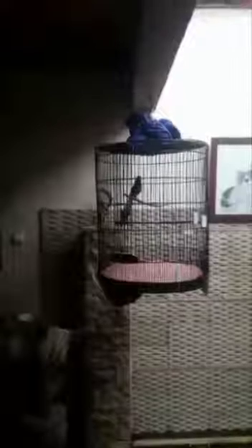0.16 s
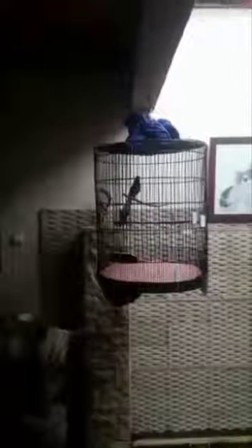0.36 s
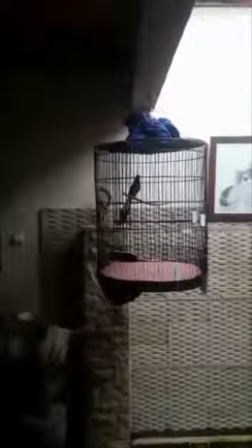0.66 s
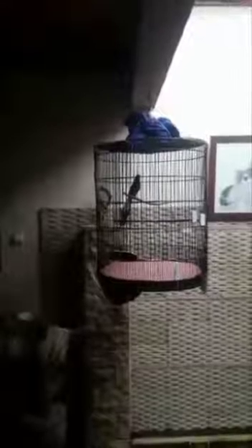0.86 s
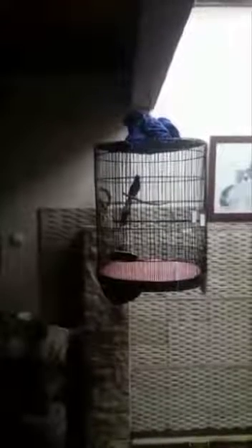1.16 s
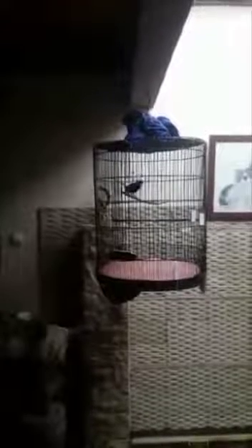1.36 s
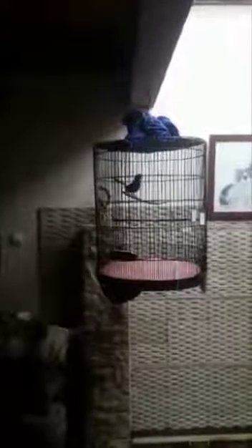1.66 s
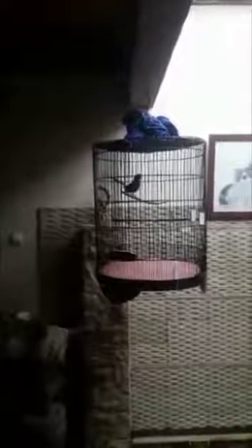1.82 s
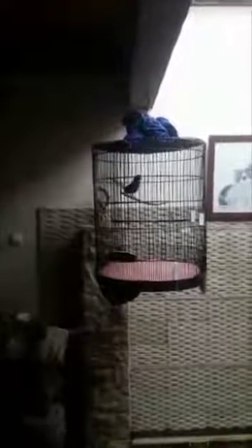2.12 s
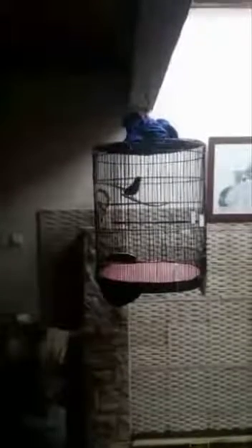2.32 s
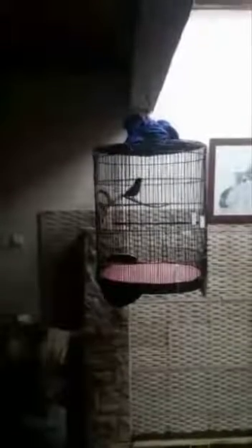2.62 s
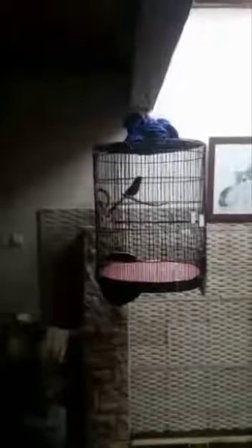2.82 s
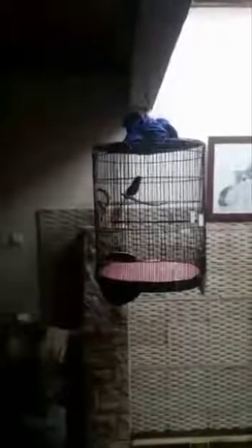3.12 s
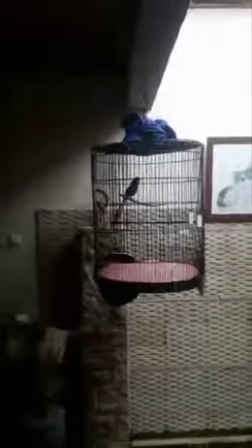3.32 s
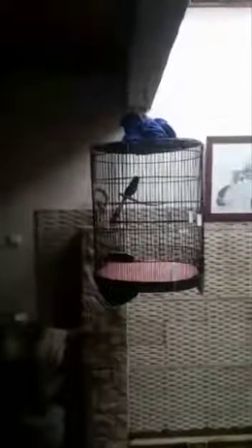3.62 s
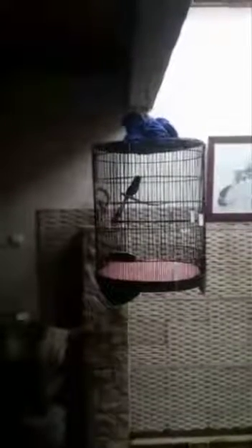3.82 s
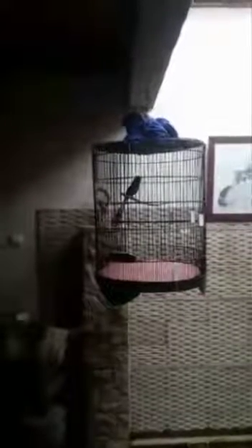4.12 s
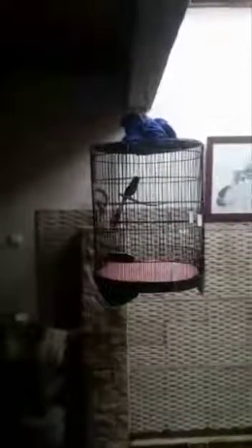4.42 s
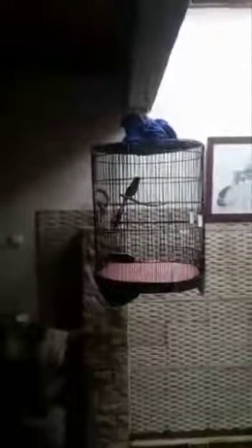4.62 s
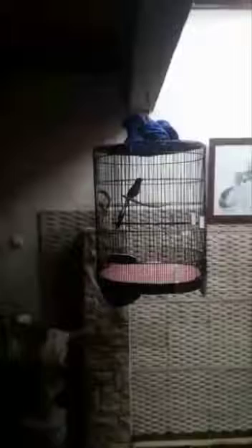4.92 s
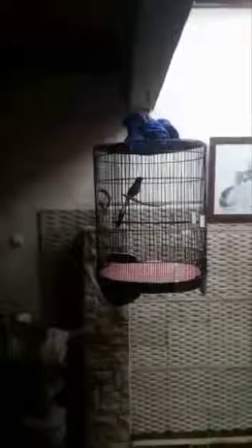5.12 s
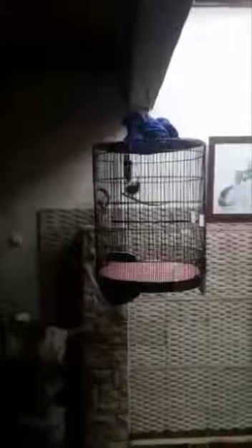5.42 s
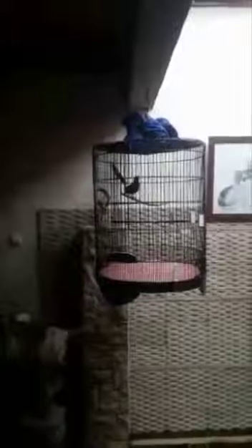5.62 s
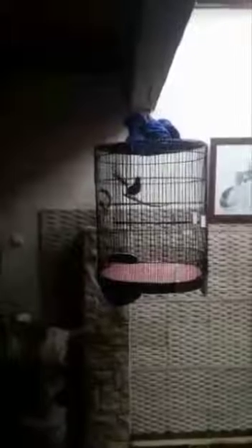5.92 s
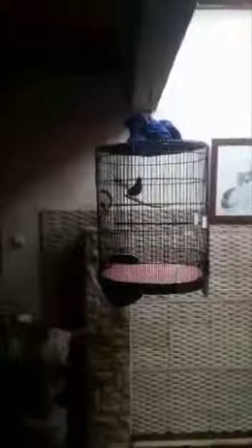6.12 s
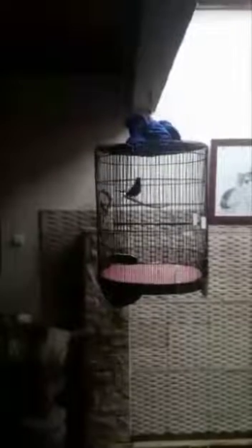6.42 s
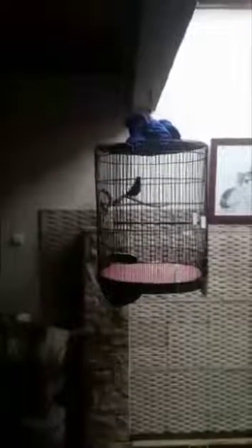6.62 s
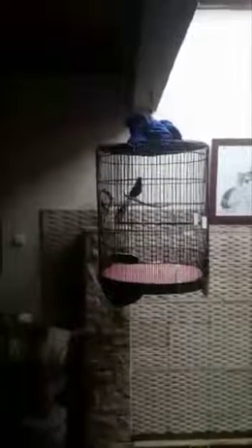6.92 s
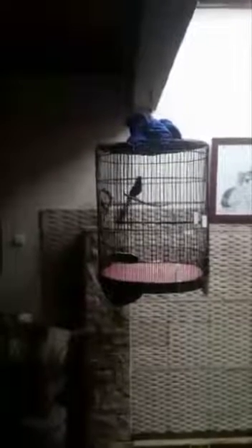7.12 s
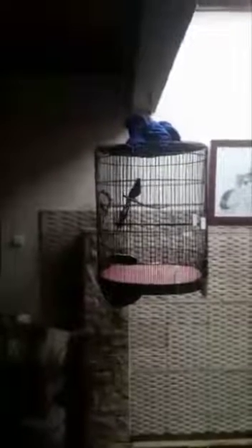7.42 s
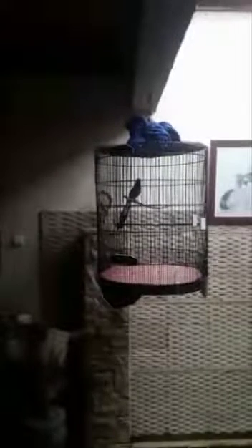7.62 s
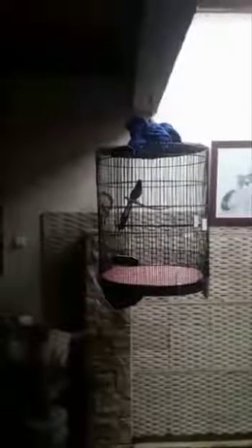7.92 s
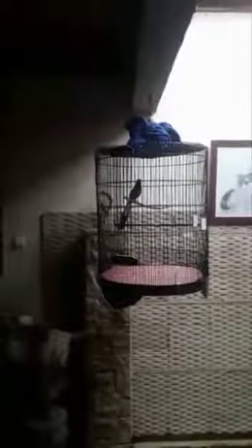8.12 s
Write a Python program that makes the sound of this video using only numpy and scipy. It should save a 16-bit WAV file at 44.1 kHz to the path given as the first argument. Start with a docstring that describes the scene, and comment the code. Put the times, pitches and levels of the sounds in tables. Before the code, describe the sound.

A songbird in a hanging cage sings loudly a few metres from the microphone in a bare, echoing room. Each phrase opens with a sharp call and several swooping notes, pauses, then breaks into a rapid rattle of high chips and a falling run of whistles. It sings this twice and begins a third. Brief wing flicks and soft cage knocks come in between, over a faint murmuring hum and distant engine.

```python
"""In a bare, echoing room, a shama (a songbird) sings in a hanging cage, a few metres from a phone.
Its phrase: a sharp two-voiced call, swoops that dive and climb, a rattle of steep high chips, then a
falling run of whistles. Its voice box, the syrinx, has two sides that can each make a gliding tone.
Wings flick and the cage is knocked now and then, over a low murmur, an engine and a far-off bird."""
import sys
import numpy as np
from scipy import signal
from scipy.fft import rfft, irfft, next_fast_len
from scipy.io import wavfile
from scipy.ndimage import uniform_filter1d, minimum_filter1d, map_coordinates

SR = 44100
rng = np.random.default_rng(int(sys.argv[2]) if len(sys.argv) > 2 else 0)


def int16_out(signal):
    """Quantize to a 16-bit WAV file."""
    q = np.round(np.clip(np.atleast_2d(signal).T, -1, 1) * 32767)
    wavfile.write(sys.argv[1], SR, q.astype(np.int16))


N = 364266
TOP_HZ = 14000  # the highest frequency the phone keeps

# How the throat boosts or softens each frequency (frequency [Hz], gain [dB])
THROAT = [(700, -13), (1150, -4.5), (1700, 1.5), (2700, 0), (3600, 0), (4500, -7.5), (5300, -1), (6200, 0),
          (7000, 0), (9000, 2), (10400, -1.5), (11300, 10), (12100, 22.5), (13000, -13)]
# The breathy hiss in the voice (frequency [Hz], level [dB])
RASP = [(400, -12.5), (1000, -10), (2500, 3.5), (3500, -1.5), (4300, -3), (5500, -8), (7000, -9),
        (9000, -6), (10500, -13.5), (12100, -34), (13200, -15)]
def syrinx(pitch, overtone_db, falloff_db, waver, rasp_db):
    """The voice box makes a slightly unsteady tone with weak overtones and hiss, shaped by the throat."""
    n = len(pitch)
    phase = 2 * np.pi * np.cumsum(pitch * (1 + waver * wobble(n, 401.3))) / SR
    tone = amp(along(THROAT, pitch)) * np.sin(phase)
    for k in range(2, 6):  # overtones are whole multiples of the pitch
        gain = amp(overtone_db + falloff_db * (k - 2.5) + along(THROAT, k * pitch))
        tone += gain * (k * pitch < TOP_HZ) * np.sin(k * phase)
    return np.sqrt(2) * tone + amp(rasp_db) * coloured(noise(n, RASP), THROAT)


def sing(out, s, syllable, hz, db, easy_hz=2100, strained_hz=2650):
    """Sing a syllable, a small group of notes: each glides in pitch and flutters a little in level."""
    for delay, length, *ratios, waver, attack, release, note_db, overtone_db in syllable:
        u = np.linspace(0, 1, int(length * SR))
        glide = hz * contour(ratios, u)
        rasp_db = np.interp(glide.mean(), [easy_hz, strained_hz], [-30.5, -31])
        note = syrinx(glide, overtone_db, falloff_db=-11, waver=waver, rasp_db=rasp_db)
        slack_db = 0.5 * np.log2(np.minimum(glide / hz, 1))  # weaker below the main pitch
        level_db = db + note_db + slack_db + 1.02 * wobble(len(u), 300)
        add(out, s + delay, in_room(amp(level_db) * note * swell(u, attack, release), direct_db=-6))


def voice(t, hz, start, shape):
    """One side of the syrinx: it comes in low at t = 0, slides up to its pitch and wavers there."""
    length, settle, waver, attack, release = shape
    pitch = hz * (1 - (1 - start) * np.exp(-(t / settle) ** 2))
    pitch *= 1 + waver * wobble(len(t), 502.5)
    return np.sin(2 * np.pi * np.cumsum(pitch) / SR) * swell(t / length, attack, release)


# A soft rising syllable, one row per note (delay [s], length [s], several pitches from start to end
# [ratio], waver [share of pitch], fade-in and fade-out [share of length], level [dB], overtones [dB])
SCOOP = [(-0.049, 0.048, 0.88, .98, 1.35, 2.4, .06, .08, .5, -15, -30)]
# The call's two voices (length [s], slide time [s], waver [share], fade-in [share], fade-out [share])
YELP = (.07, .009, .016, .08, .45)
HELD = (0.076, .03, 0.014, 0.68, .3)
# The harsh extra tones the two voices make together (frequency [Hz], gain [dB])
CLASH = [(800, -41), (2000, -5.5), (3600, 16.5), (4400, 4.5), (5300, 6.5), (7000, 5.5), (9000, -12.5),
         (13000, -20)]
# Opening calls (time [s], held voice's time [s], yelp pitch [Hz], held pitch [Hz],
# held voice's starting pitch [ratio], yelp level [dB], held level [dB])
CALLS = [(0.135, 0.151, 2824, 2650, 0.85, -18.5, -16), (3.746, 3.771, 3015, 2548, .87, -18, -13),
         (7.615, 7.629, 3012, 2543, .86, -18.5, -13.5)]
def calls(out, scoop_hz=917):
    """A soft scoop, then a sharp yelp; the other side of the syrinx joins in lower and the two clash."""
    t = np.arange(SR // 8) / SR
    for s, held_s, yelp_hz, held_hz, held_start, yelp_db, held_db in CALLS:
        sing(out, s, SCOOP, scoop_hz, held_db)
        yelp = amp(yelp_db - held_db) * voice(t, yelp_hz, start=0.74, shape=YELP)
        both = yelp + voice(t + s - held_s, held_hz, held_start, HELD)
        clash = coloured(amp(-27) * both ** 2 + amp(-18) * both ** 3, CLASH)
        loudness = np.abs(signal.hilbert(both))
        rasp = amp(-26) * coloured(noise(len(t), RASP), THROAT) * loudness
        flutter = amp(2 * wobble(len(t), rate=700))
        add(out, s, in_room(amp(held_db) * (both + clash + rasp) * flutter, direct_db=-4))


# The three syllables of a swoop, with the same columns as SCOOP
DIVE = [(-.016, .022, .6, .68, .78, .92, .04, .4, .3, -15, -46),
        (0, .02, .86, 1.0, 1.02, .95, .04, .15, .4, -1, -46),
        (.012, .03, .92, .8, .6, .42, .05, .25, .3, -4, -46),
        (.018, .03, .92, 1.02, 1.02, .88, .04, .2, .6, -2, -46)]
TURN = [(-.052, .054, .3, .42, .52, .53, .66, .06, .45, .3, -5, -48)]
CLIMB = [(-.003, .076, 0.55, .83, .91, .965, .975, .91, 0.02, 0.12, 0.62, 0, -35)]
# Swoops (time [s], climb time [s], dive pitch [Hz], climb pitch [Hz], dive level [dB], climb level [dB])
SWOOPS = [(0.277, 0.398, 1665, 2644, -18.5, -19.5), (0.526, 0.632, 1729, 2747, -20, -16.5),
          (0.779, 0.868, 1688, 2730, -22, -17.5), (3.895, 4.032, 1705, 2616, -19.5, -20),
          (4.148, 4.224, 1824, 2782, -19, -19.5), (4.353, 4.427, 1881, 2609, -23.5, -17.5),
          (4.553, 4.634, 1866, 2700, -21.5, -20), (7.757, 7.881, 1700, 2584, -20.5, -17),
          (8.029, 8.118, 1693, 2660, -21.5, -18.5)]
def swoops(out):
    """The voice barks twice as it tumbles an octave, turns, then climbs fast and fades at the top."""
    for s, climb_s, dive_hz, climb_hz, dive_db, climb_db in SWOOPS:
        sing(out, s, DIVE, dive_hz, dive_db)
        sing(out, climb_s, TURN, climb_hz, dive_db)
        sing(out, climb_s, CLIMB, climb_hz, climb_db)


# A chip's fall and its spring back up (pitches from start to end [ratio])
PLUNGE = [0.88, 0.97, .78, .70, 0.645, 0.53]
REBOUND = [1, 0.86, 0.91]
# Chips (time [s], top pitch [Hz], depth of fall [exponent], level [dB], extra weight on the low end [dB])
CHIPS = [(1.779, 6440, 1.3, -32, -46.5), (1.882, 6310, 0.97, -22.5, 5), (1.981, 6390, 0.96, -20, 10),
         (2.073, 6170, 0.96, -19.5, 1.5), (2.160, 6320, 1, -20.5, 10.5), (2.249, 6330, 1.1, -21.5, -10.5),
         (2.337, 6230, 1.05, -21, -7), (2.426, 6260, 0.92, -19, 6), (2.517, 6100, 0.99, -21, 2),
         (2.610, 6080, 0.94, -20.5, -0.5), (2.727, 6000, 0.95, -24, 1), (5.506, 6336, 1.15, -25, -22),
         (5.615, 6420, 0.98, -25.5, -13), (5.707, 6760, 1.27, -21.5, -18.5), (5.795, 6610, 0.95, -21.5, 20),
         (5.885, 6305, 0.92, -20, 10), (5.974, 6260, 0.88, -18, 11), (6.061, 6315, 1.12, -21.5, -0.5),
         (6.159, 6290, 0.92, -21.5, 3.5), (6.256, 6110, 1.1, -21, -6.5), (6.347, 6050, 1, -22, -14),
         (6.440, 6056, 1.06, -20.5, -14), (6.553, 5960, 0.87, -22, -4)]
def rattle(out, chip_s=.052, rebound_s=.024, rebound_delay_s=.04):
    """Each chip hangs at its top for an instant, plunges almost an octave and springs back softly."""
    u = np.linspace(0, 1, int(chip_s * SR))
    v = np.linspace(0, 1, int(rebound_s * SR))
    for s, top_hz, depth, db, lean_db in CHIPS:
        plunge_hz = top_hz * contour(PLUNGE, u) ** depth
        chip = syrinx(plunge_hz, overtone_db=-34.5, falloff_db=7.5, waver=.016, rasp_db=-34.5)
        chip *= swell(u, rise=0.42, fall=0.59)
        level_db = db + lean_db * (u - .5) + 3 * wobble(len(u), rate=700)
        add(out, s, in_room(amp(level_db) * chip, direct_db=-8))
        rebound_hz = top_hz * contour(REBOUND, v)
        rebound = syrinx(rebound_hz, overtone_db=-37.5, falloff_db=2, waver=.008, rasp_db=-41)
        rebound *= np.sin(np.pi * v)
        add(out, s + rebound_delay_s, in_room(amp(db - 8) * rebound, direct_db=-5.5))


# The syllables of a closing run, with the same columns as SCOOP
SLUR = [(0, .165, .92, .975, 1.0, 1.005, .99, .009, .33, .25, -3.5, -31)]
PEAK = [(0, 0.041, 0.81, 0.85, 1.18, 1.1, 0.035, 0.099, 0.42, -4.5, -46),
        (.031, .05, 1.07, 0.99, .84, .69, 0.044, 0.45, 0.24, 3.5, -34.5)]
HOOK = [(0.00043, 0.024, 0.68, 0.94, 1.05, 1.1, 0.042, 0.67, 0.31, 0.05, -40)]
CHUCK = [(0, 0.0304, 0.74, 1.01, 0.93, 0.9, 0.0265, 0.14, 0.28, 0, -48)]
LOW_WHISTLE = [(0, .05, .76, .84, .89, .94, .012, .4, .3, -13, -45),
               (.04, .09, .92, 1.0, 1.04, 1.17, 1.5, .022, .2, .5, -1.5, -42),
               (.05, .035, .64, .66, .67, .64, .05, .3, .5, -23, -45)]
# The falling runs that close a phrase (time [s], syllable, pitch [Hz], level [dB])
RUNS = [(-.33, CHUCK, 2017, -13.5), (-.23, LOW_WHISTLE, 1060, -14.5), (2.814, SLUR, 1534, -22),
        (2.917, PEAK, 2292, -20), (3.060, HOOK, 1484, -19), (3.166, CHUCK, 1781, -18.5),
        (3.249, LOW_WHISTLE, 1070, -17.5), (6.723, SLUR, 1603, -20.5), (6.834, PEAK, 2274, -21),
        (6.992, CHUCK, 2105, -17), (7.064, HOOK, 1877, -15), (7.142, LOW_WHISTLE, 1044, -18)]
def runs(out):
    """A long, smooth note leaps to a peak; two short notes lead down to a low whistle."""
    for s, syllable, hz, db in RUNS:
        sing(out, s, syllable, hz, db)


# The bright hiss of a wing flick (frequency [Hz], level [dB])
FLICK_COLOUR = [(200, -74), (1000, -5), (3000, -0.5), (5000, -0.5), (7200, 6), (8200, -4.5), (12000, -15.5),
                (14000, -28)]
# Wing flicks (time [s], length [s], level [dB])
FLICKS = [(1.275, 0.0092, -57), (1.487, 0.016, -85), (1.618, 0.05, -48), (4.922, 0.015, -56),
          (5.184, 0.01129, -56.5), (5.264, 0.017, -62), (5.425, 0.033, -64.5), (7.308, 0.038, -32),
          (7.544, 0.027, -54.5), (7.739, 0.0177, -29), (8.222, 0.033, -31.5)]
def wings(out):
    """Feathers brush the bars in short, bright bursts of noise."""
    for s, length, db in FLICKS:
        u = np.linspace(0, 1, int(length * SR))
        brush = noise(len(u), FLICK_COLOUR) * swell(u, rise=0.29, fall=0.48)
        add(out, s, in_room(amp(db) * brush, direct_db=0))


# The dull sound of the wood (frequency [Hz], level [dB])
KNOCK_COLOUR = [(50, -55), (130, -11), (280, -12), (450, -10), (620, -4), (850, 2), (1200, -2), (1800, -6),
                (2300, -13), (2900, -21), (4000, -29), (7000, -37), (12000, -66)]
# Knocks on the cage (time [s], level [dB])
KNOCKS = [(1.329, -37.5), (1.620, -44), (1.791, -46.5), (1.935, -42), (2.623, -42.5), (5.071, -24.5),
          (5.079, -27)]
def knocks(out, ring_s=.04):
    """Dull blows on wood that die away quickly."""
    t = np.arange(SR // 10) / SR
    fade = amp(-60 * t / ring_s)
    for s, db in KNOCKS:
        add(out, s, in_room(amp(db) * noise(len(t), KNOCK_COLOUR) * fade, direct_db=-1.5))


# The sound of feet and feathers stirring (frequency [Hz], level [dB])
RUSTLE_COLOUR = [(300, -20.5), (700, -4.5), (1500, 8.5), (2800, -19.5), (4200, -23.5), (7000, -21),
                 (12000, -42.5)]
def rustles(out):
    """Faint, uneven scuffs as the bird shifts on its perch."""
    scuffs = coloured(rng.standard_normal(N), RUSTLE_COLOUR) * amp(7 * wobble(N, rate=15))
    add(out, 0, in_room(amp(-66.5) * unit(scuffs), direct_db=10.5))


# Faint notes of another bird (time [s], pitch [Hz], level [dB])
FAR_NOTES = [(1.839, 1480, -47), (2.201, 1067, -47), (2.251, 816, -44.5), (2.869, 886, -43.5),
             (5.713, 1340, -44.5), (5.931, 878, -47), (6.299, 800, -46)]
def far_bird(out, length_s=0.021, slide=0.224):
    """A bird further off sings short rising notes that arrive mostly as echo."""
    u = np.linspace(0, 1, int(length_s * SR))
    for s, hz, db in FAR_NOTES:
        phase = 2 * np.pi * np.cumsum(hz * (1 + slide * (u - .5))) / SR
        add(out, s, in_room(amp(db) * np.sin(phase) * np.sin(np.pi * u), direct_db=-5.5))


# The house's constant murmur and its deeper rumble (frequency [Hz], level [dB])
MURMUR = [(25, -30), (50, -18), (75, -11.5), (130, -1), (200, -5), (350, -6.5), (700, -15.5), (1300, -19),
          (2000, -13), (4500, -18), (7200, -26), (9500, -44.5), (13000, -51.5)]
RUMBLE = [(25, -9.5), (60, -3), (95, -8), (170, -2), (400, -35), (1500, -87)]
def house(rumble_at_s=3.83, rumble_width_s=0.23):
    """The house murmurs with low, gently wavering noise; one brief rumble swells and fades."""
    murmur = amp(-56.5 + 1.7 * wobble(N, 5.8)) * unit(coloured(rng.standard_normal((2, N)), MURMUR))
    bump = np.exp(-((np.arange(N) / SR - rumble_at_s) / rumble_width_s) ** 2)
    return murmur + amp(-61.5) * bump * unit(coloured(rng.standard_normal(N), RUMBLE))


# How fast the engine runs (time [s], firing rate [Hz])
ENGINE_SPEED = [(0, 46), (1.3, 30.3), (2.0, 36.6), (2.4, 23.5), (3.0, 29), (3.7, 30.3), (4.4, 36.3),
                (5.2, 32.04), (7.4, 40.9), (8.26, 35)]
# The tones in its drone (frequency [multiple of the firing rate], level [dB])
ENGINE_TONES = [(3, -8), (4, 0), (5, -1), (6, -5), (7, -13), (9, -20)]
def engine(db_per_octave=5):
    """An engine outside slows and picks up again, growing louder as it runs faster."""
    firing_hz = np.interp(np.arange(N) / SR, *np.transpose(ENGINE_SPEED))
    phase = 2 * np.pi * np.cumsum(firing_hz) / SR
    # on the way in through the walls, each tone fades and drifts by itself
    drone = sum(amp(db + 4 * wobble(N, 6)) * np.sin(k * phase + np.pi * wobble(N, 7))
                for k, db in ENGINE_TONES)
    return amp(-62 + db_per_octave * np.log2(firing_hz / firing_hz.mean())) * drone


def tick(out, at_s=4.279, hz=4500, ring_s=.0004):
    """One tiny, sharp tick with no echo."""
    t = np.arange(SR // 1000) / SR
    add(out, at_s, amp(-9 - 60 * t / ring_s) * np.cos(2 * np.pi * hz * t))


# How long the room rings (frequency [Hz], time to fade by 60 dB [s])
ECHO_TIMES = [(150, 0.88), (900, 0.5775), (2400, 0.64), (5000, 0.57), (12000, 0.52)]
def in_room(x, direct_db, walls_db=-2, walls_fade_s=0.2, tail_db=2, gap_s=.004):
    """A sound arrives directly, then bounces off the near walls and leaves a long tail of echo."""
    hz, t, spectrum = signal.stft(rng.standard_normal((2, int(.7 * SR))), SR, nperseg=256)
    spectrum *= amp(-60 * t / along(ECHO_TIMES, hz)[:, None])
    tail = signal.istft(spectrum, SR, nperseg=256)[1]
    t = np.arange(tail.shape[1]) / SR
    tail *= 1 - np.exp(-t / gap_s)
    walls = rng.standard_normal(tail.shape) ** 3 * amp(-60 * t / walls_fade_s) * (t > gap_s)
    norm = np.linalg.norm
    echoes = amp(tail_db) * tail / norm(tail[0]) + amp(walls_db) * walls / norm(walls[0])
    heard = signal.fftconvolve(x[None], echoes, axes=1)
    # each sound gets a new echo pattern, as when the bird turns its head; keep the strength steady
    heard *= norm(x) * norm(echoes.mean(0)) / norm(heard.mean(0))
    heard[:, :len(x)] += amp(direct_db) * x
    return heard


def amp(db):
    """Turn decibels into a number to multiply by."""
    return 10 ** (np.asarray(db) / 20)


def unit(x):
    """Scale a sound to an average strength (rms) of 1."""
    return x / np.sqrt(np.mean(x ** 2) + 1e-20)


def along(points, hz):
    """Read between (frequency [Hz], value) points, with octaves evenly spaced."""
    freqs, values = np.transpose(points)
    return np.interp(np.log(hz + 1), np.log(freqs + 1), values)


def coloured(x, points):
    """Boost or soften parts of a sound by (frequency [Hz], gain [dB]) points."""
    n = x.shape[-1]
    padded = next_fast_len(n + 2048)
    gain = amp(along(points, np.fft.rfftfreq(padded, 1 / SR)))
    return irfft(rfft(x, padded) * gain, padded)[..., :n]


def noise(n, points):
    """n samples of coloured noise, a quarter of a second at most."""
    return unit(coloured(rng.standard_normal(SR // 4), points))[:n]


def wobble(n, rate):
    """A smooth curve through `rate` random values a second."""
    return map_coordinates(rng.standard_normal(512), [np.arange(n) * rate / SR], mode="wrap")


def swell(u, rise, fall):
    """Fade a note in and out as u goes from 0 to 1; rise and fall are shares of its length."""
    return np.sin(np.pi / 2 * np.clip(np.minimum(u / rise, (1 - u) / fall), 0, 1)) ** 2


def contour(ratios, u):
    """Glide smoothly through pitch ratios, evenly spaced in time, as u goes from 0 to 1."""
    return np.polyval(np.polyfit(np.linspace(0, 1, len(ratios)), ratios, len(ratios) - 1), u)


def add(out, s, x):
    """Mix x into out at time s; anything before the start or past the end is lost."""
    i = round(s * SR)
    x, i = x[..., max(-i, 0):], max(i, 0)
    out[:, i:i + x.shape[-1]] += x[..., :max(N - i, 0)]


def scene():
    """The bird and its cage over the room's background."""
    out = house() + engine()
    for source in (tick, calls, swoops, rattle, runs, wings, rustles, knocks, far_bird):
        source(out)
    return out


# How much of the left-right difference the phone keeps (frequency [Hz], gain [dB])
STEREO_WIDTH = [(3000, -60), (3900, -14), (5000, -5), (9000, -6), (13000, -11)]
# How its microphone boosts or softens each frequency (frequency [Hz], gain [dB])
MICROPHONE = [(6400, 6), (7300, 1), (7900, -10.5), (8700, 2), (12500, -3.5), (13600, -9)]
def record(dry, ceiling=.88):
    """The phone is stereo only in the treble, turns loud peaks down and cuts off the very top."""
    mid = (dry[0] + dry[1]) / 2
    side = coloured((dry[0] - dry[1]) / 2, STEREO_WIDTH)
    pair = coloured(np.array([mid + side, mid - side]), MICROPHONE)
    safe_gain = np.minimum(1, ceiling / (np.abs(pair).max(axis=0) + 1e-9))
    pair *= uniform_filter1d(minimum_filter1d(safe_gain, size=600), size=500)
    return irfft(rfft(pair) * (np.fft.rfftfreq(N, 1 / SR) < TOP_HZ), N)


dry = scene()
out = record(dry)
int16_out(out)
```